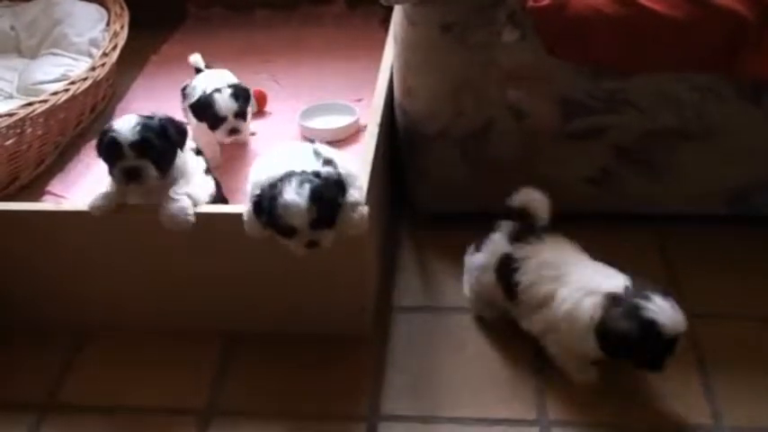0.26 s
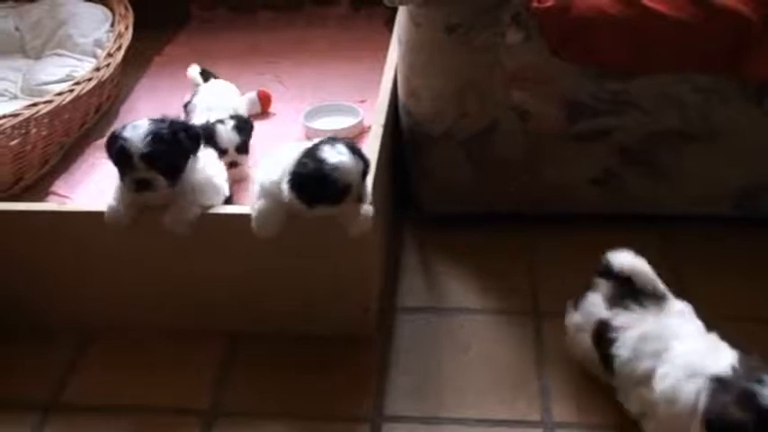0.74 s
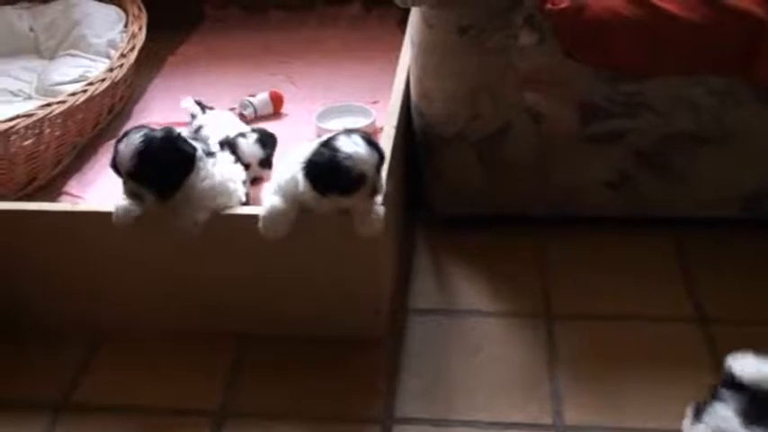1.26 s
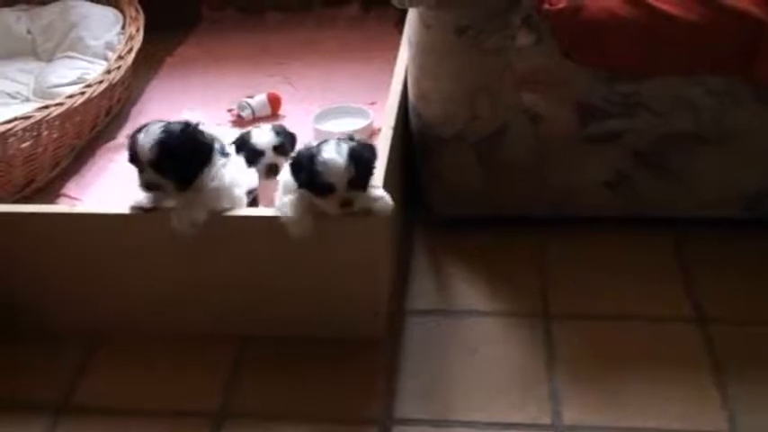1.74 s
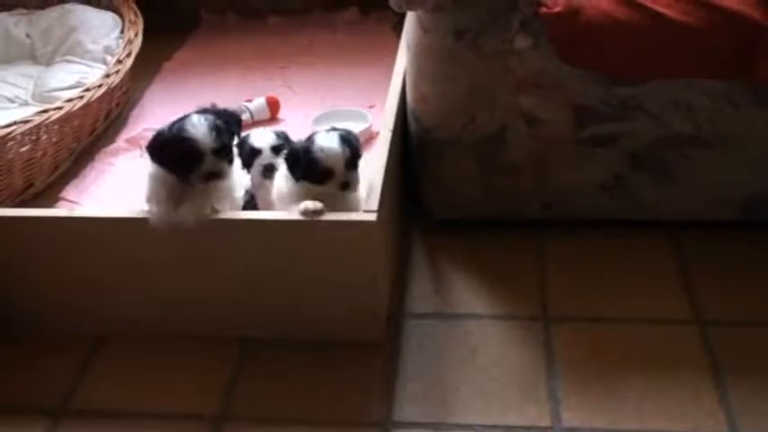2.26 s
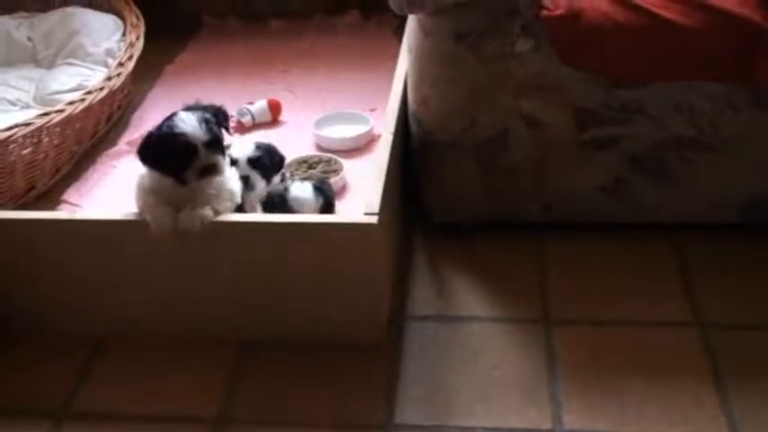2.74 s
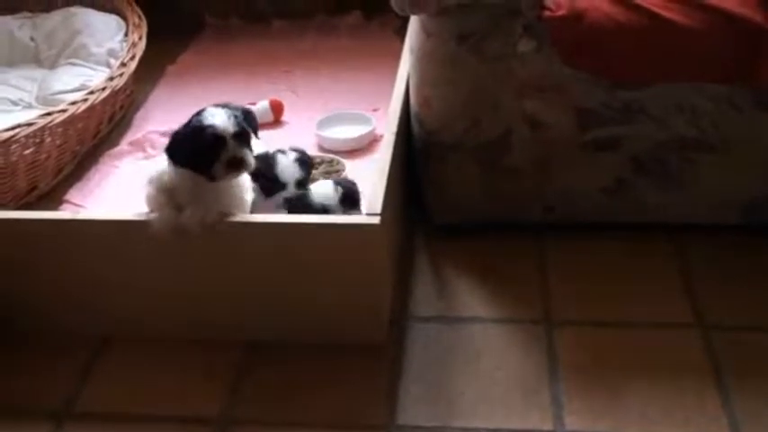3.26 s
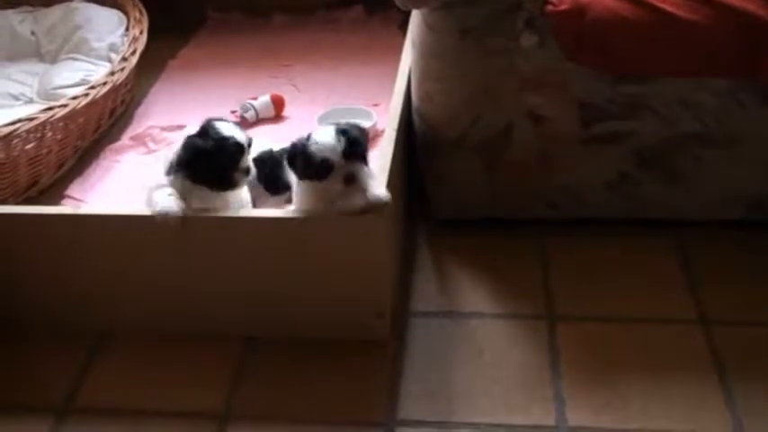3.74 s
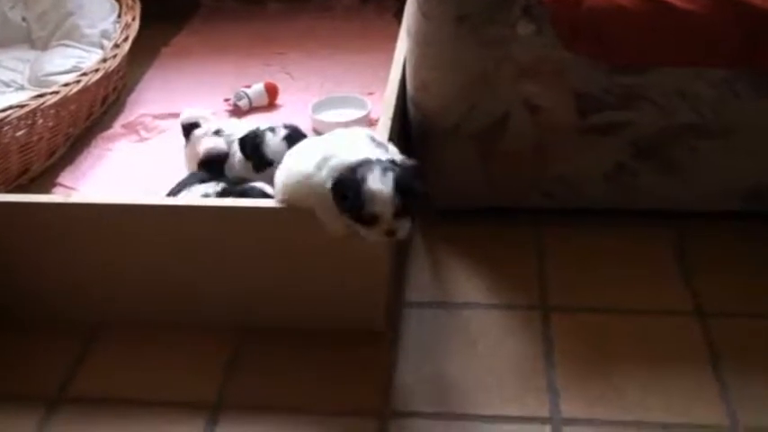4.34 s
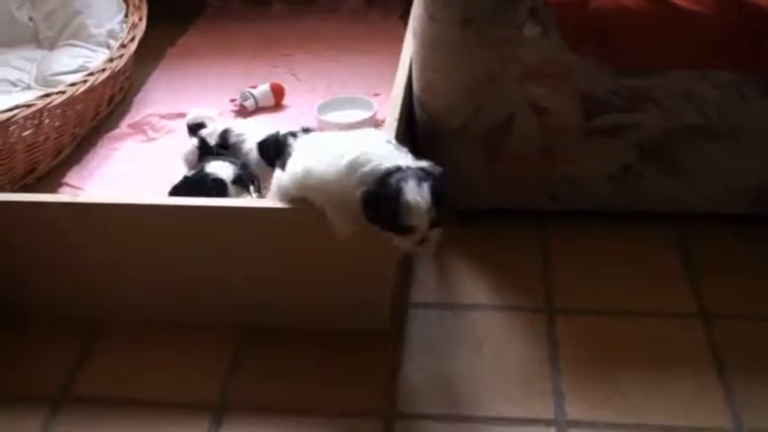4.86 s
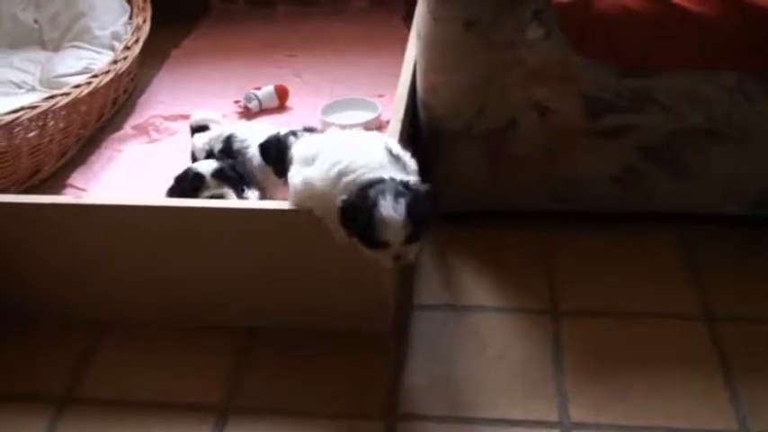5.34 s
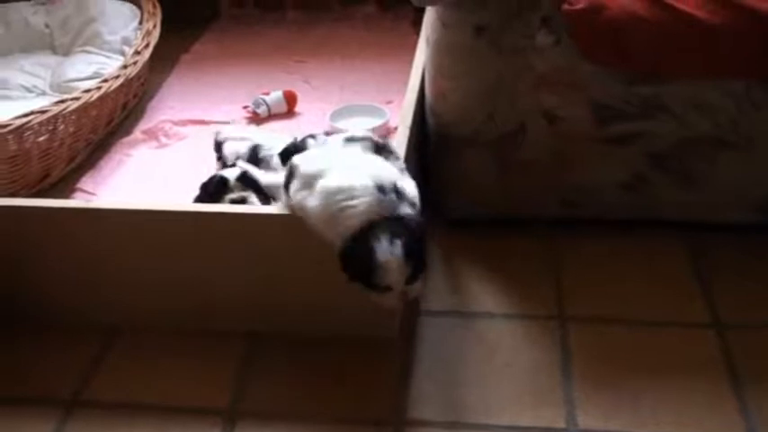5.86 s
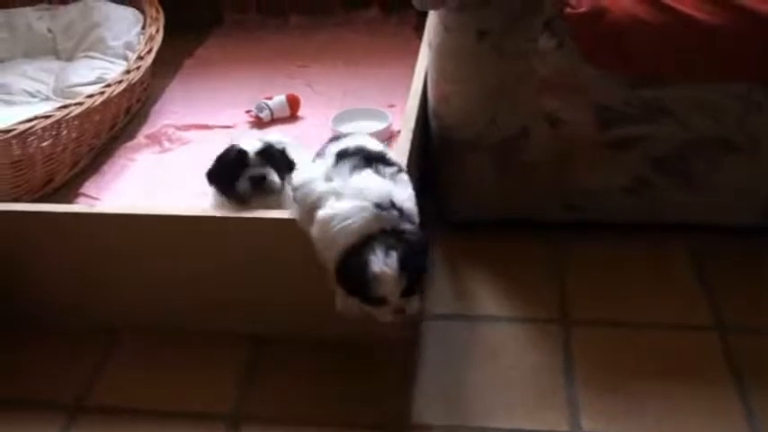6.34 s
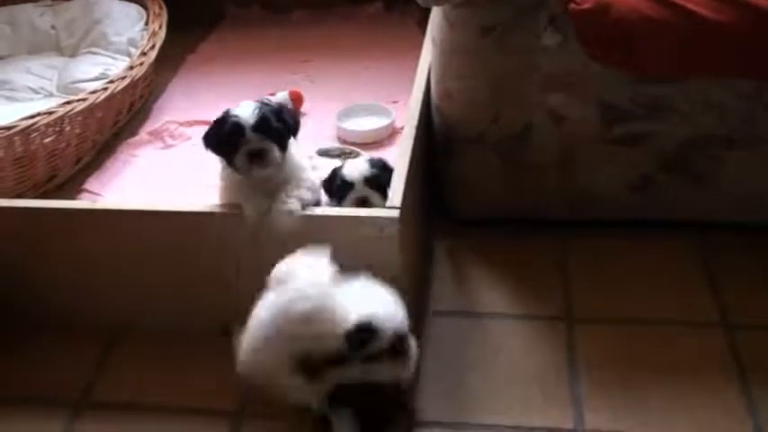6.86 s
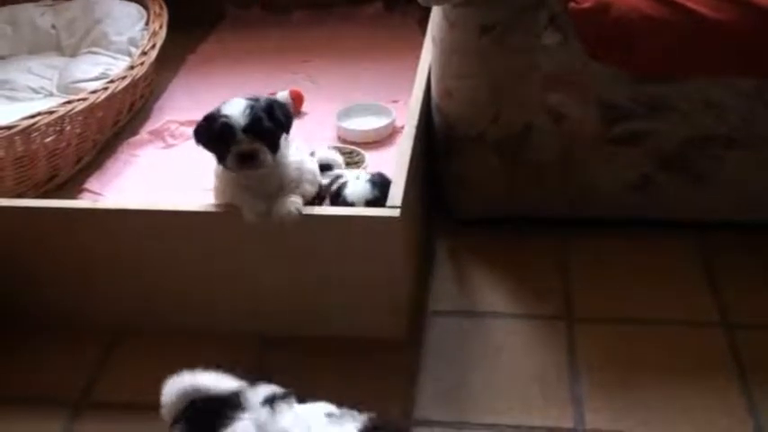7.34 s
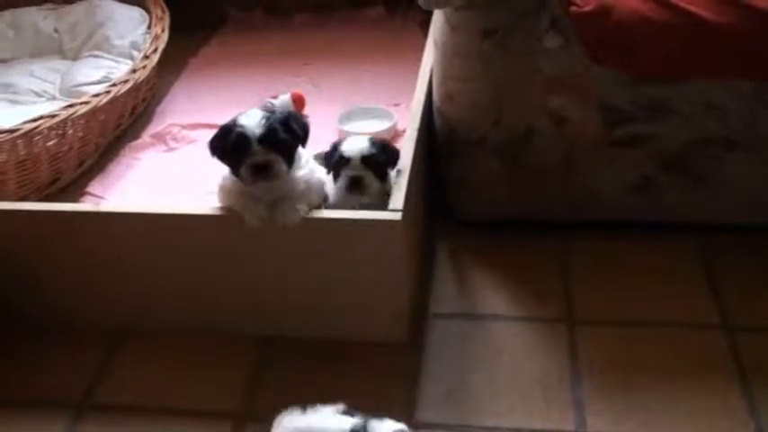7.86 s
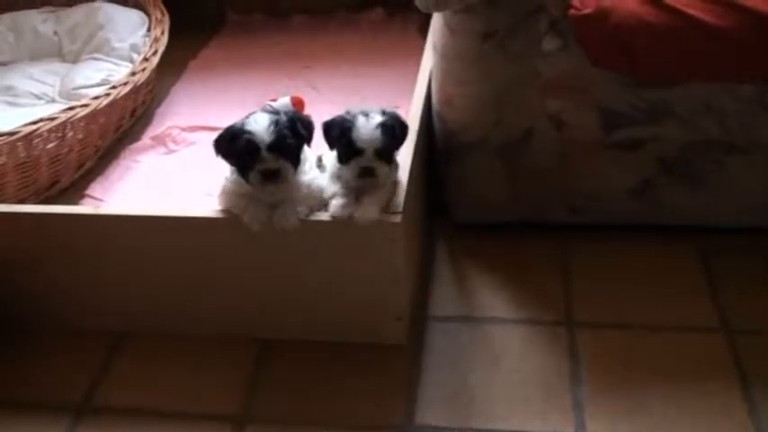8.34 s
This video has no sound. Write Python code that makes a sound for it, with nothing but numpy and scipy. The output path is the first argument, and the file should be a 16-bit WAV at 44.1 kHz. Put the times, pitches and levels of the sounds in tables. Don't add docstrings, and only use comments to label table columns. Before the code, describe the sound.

Several young puppies in a wooden pen indoors. Short yips and bedding rustle come first, then wavering, sinking whines with hoarse rasps between them. A nose blasts air like a sneeze, more whines rise, and two loud shrill squeals ring from further back. A puppy drops over the wall with a heavy hollow thud and claw clicks, then little but faint rustles. Small camera, sounds leaning right, soft room hiss.

```python
import sys
import numpy as np
from scipy import signal
from scipy.fft import rfft, irfft
from scipy.io import wavfile
from scipy.ndimage import uniform_filter1d

SR = 44100
rng = np.random.default_rng(int(sys.argv[2]) if len(sys.argv) > 2 else 0)


def to_wav(s):
    ch = np.atleast_2d(s).T
    pcm = np.round(np.clip(ch, -1, 1) * 32767)
    wavfile.write(sys.argv[1], SR, pcm.astype(np.int16))


def nominal_scale(level):
    x = np.asarray(level, float) / 20
    return 10 ** x


N = 379260


def evened(x):
    return x / np.sqrt(np.mean(x ** 2) + 1e-20)


def read(points, hz):
    f, value = np.transpose(points)
    return np.interp(np.log(hz + 1), np.log(f + 1), value)


def add(mix, s, sound):
    part = mix[max(round(s * SR), 0):][:len(sound)]
    part += sound[:len(part)]


def colour(x, points):
    gain = nominal_scale(read(points, np.fft.rfftfreq(x.shape[-1], 1 / SR)))
    return irfft(rfft(x) * gain, x.shape[-1])


def resonate(x, hz, width):
    turn = np.exp(2j * np.pi * hz * np.arange(len(x)) / SR)
    r = np.exp(-np.pi * width / SR)
    return 2 * (turn * signal.lfilter([(1 - r) ** 2], [1, -2 * r, r * r], x / turn)).real


def wander(count, smooth):
    noise = uniform_filter1d(rng.standard_normal(count), int(smooth))
    return evened(uniform_filter1d(noise, int(smooth)))


def air():
    # f/Hz, density/(dB per Hz)
    tone_spectrum = [(15, -53), (25, -47), (87, -9.5), (144, -3.5), (217, 1.5), (392, -2), (673, -1.5),
                     (1290, -3), (1510, -5), (8280, -19.5), (13500, -25), (15800, -29.5)]
    # f/Hz, likeness/1
    coherence = [(60, 0.25), (240, 0.25), (950, 0.43), (3770, 0.1), (15000, 0.061)]
    # t/s, level/dB
    rumble_level = [
        (0.0, -49.5),
        (4.36, -63.5),
        (8.6, -65),
    ]
    hz = np.fft.rfftfreq(N, 1 / SR)
    a, b, c = rfft(rng.standard_normal((3, N)))
    same = np.clip(read(coherence, hz), 0, 1)
    pair = np.array([a, same * a + np.sqrt(1 - same ** 2) * b]) * nominal_scale(read(tone_spectrum, hz))
    tone = nominal_scale(-51.5 - 0.1 + np.array([[-1.6], [1.6]])) * evened(irfft(pair, N))
    s, db = np.transpose(rumble_level)
    rumble_band = [(20, -7.0), (60, -7.5), (95, -4), (160, -23), (300, -80.0)]  # f/Hz, level/dB
    low = evened(irfft(c * nominal_scale(read(rumble_band, hz)), N))
    return tone + nominal_scale(np.interp(np.arange(N) / SR, s, db) + np.array([[-13], [1.5]])) * low


def rustle():
    # t of the peak/s, level/dB, fade/(dB per s)
    movements = [(.15, -52, 54), (.406, -54, 219), (.594, -58, 48), (1.2, -68, 1), (2.31, -58, 150),
                 (2.5, -68, 150), (2.86, -50.5, 217), (3.278, -59.5, 93), (4.73, -70.5, 86),
                 (5.066, -52.5, 200), (5.26, -65.5, 78), (5.9, -57.5, 95), (6.902, -52.5, 111),
                 (7.08, -55, 159), (7.426, -59, 104), (7.584, -51.5, 208), (8.4, -56, 220),
                 (4.24, -46.5, 62)]
    # f/Hz, density/(dB per Hz)
    cloth = [(880, -58), (1500, 8.5), (1970, 5.5), (2350, 5), (2640, -3), (7020, 1), (15500, -11)]
    t, level = np.arange(N) / SR, np.zeros(N)
    for s, db, fade_db in movements:
        slope_db = np.where(t < s, 257, fade_db)
        level += nominal_scale(db - slope_db * abs(t - s))
    grain = nominal_scale(2.4 * wander(N, smooth=66)) * rng.standard_normal((2, N))
    crossed = grain + 0.3 * grain[::-1]
    return nominal_scale(1.0) * uniform_filter1d(level, size=3000) * evened(colour(crossed, cloth))


def room(x, gap, scale):
    # f/Hz, t60/s
    decay_time = [(200, 0.38), (1000, 0.33), (3000, 0.44), (8000, 0.3), (15000, 0.3)]
    taps = np.zeros((2, SR))
    slots = np.arange(int(gap * SR), SR - 20, 20)
    at = slots + rng.integers(0, 20, (2, len(slots)))
    np.put_along_axis(taps, at, rng.choice([-1., 1.], at.shape), 1)
    taps[0] = 0.3 * taps[1] + 1.56 * taps[0]
    hz, t, z = signal.stft(taps, SR, nperseg=256)
    decay = nominal_scale(-60 * t / (scale * read(decay_time, hz)[:, None]))
    tail = signal.istft(z * decay, SR, nperseg=256)[1]
    tail = tail / np.linalg.norm(tail, axis=1)[:, None]
    return signal.fftconvolve(x[None], tail, axes=1)[:, :N]


def squeal(rows):
    overtones_db = [-4.5, -19.5, -40, -42, -33.5]
    # f/Hz, level/dB
    breath_spectrum = [(1300, -31), (1800, -5), (3200, 0), (3700, -9), (4400, -14.5), (6200, -6.5),
                       (7100, -13.5), (9000, -15), (15500, -56)]
    s, *columns = np.transpose(rows)
    t = np.arange(s[0], s[-1], 1 / SR)
    hz, db = (np.interp(t, s, c) for c in columns)
    unsteady = np.clip((-13 - db) / 520, .008, .07)
    phase = 2 * np.pi * np.cumsum(hz * (1 + unsteady * wander(len(t), smooth=60))) / SR
    tone = 0
    for k, d in enumerate(overtones_db, 1):
        tone = tone + nominal_scale(d + 3.53 * wander(len(t), smooth=130 / k)) * np.sin(k * phase)
    breath = nominal_scale(-16) * evened(colour(rng.standard_normal(len(t)), breath_spectrum))
    return s[0], nominal_scale(db) * (tone + breath) * signal.windows.tukey(len(t), .15)


def squeak(s, length, first_hz, last_hz, db):
    middle_hz = (first_hz + last_hz) / 2
    return [(s, first_hz, db), (s + length / 2, middle_hz, db), (s + length, last_hz, db - 17)]


def distant_puppies():
    # t/s, f/Hz, level/dB
    squeals = [
        [(3.89, 1850, -27.5), (3.96, 2104, -29), (3.99, 2900, -25), (4.08, 2300, -34.5), (4.12, 2890, -24.5),
         (4.15, 3062, -24.5), (4.2, 2950, -60)],
        [(6.15, 1552, -35.5), (6.18, 1955, -24), (6.22, 2250, -23), (6.25, 3000, -16), (6.28, 3230, -17),
         (6.33, 3306, -17), (6.39, 3210, -30.5)],
        [(6.37, 1700, -30), (6.44, 2062, -26), (6.51, 3085, -22), (6.56, 2650, -29), (6.6, 3177, -22.5),
         (6.64, 3318, -23), (6.7, 3350, -43), (6.85, 3350, -75.5)],
    ]
    # t/s, length/s, first f/Hz, last f/Hz, level/dB
    squeaks = [(0, 0.086, 2955, 2490, -41.5), (0.225, 0.07, 2600, 2547, -36), (0.633, .1, 3650, 3520, -48),
               (1.093, 0.065, 2600, 3150, -44.5), (1.18, 0.098, 2363, 2875, -45.5),
               (2.292, .16, 2702, 3000, -49.5), (3.929, .3, 1940, 2348, -34),
               (3.785, 0.088, 2800, 3287, -34), (5.254, 0.093, 2537, 3124, -43),
               (5.37, 0.051, 2440, 2430, -52), (8.508, 0.066, 1900, 2420, -48.5),
               (8.51, .06, 1462, 1600, -52)]
    # f/Hz, level/dB
    far_throat = [(3500, 0.5), (3750, -7), (4200, -1.5), (4700, 1.5), (6750, -1.5), (7100, -14), (7700, -7),
                  (8600, -2)]
    far = np.zeros(N)
    for rows in squeals + [squeak(*row) for row in squeaks]:
        add(far, *squeal(rows))
    return colour(far, far_throat)


def step(s, thud_db, knock_db, tick_db):
    # f/Hz, level/dB
    thud_spectrum = [(40, -44), (90, 2), (145, -3), (220, -3.5), (350, -12.5), (700, -59)]
    # f/Hz, width/Hz, level/dB
    knock_modes = [(461, 175, 1), (650, 48, 0), (1030, 370, -4), (1410, 320, -12.5), (1830, 1200, -19)]
    # f/Hz, width/Hz, level/dB
    tick_modes = [(1540, 1200, 5), (2650, 670, 8), (3820, 1040, 3), (5830, 2300, -2.5), (7340, 4700, -14.5),
                  (10600, 2000, -19)]

    def struck(x, modes):
        return evened(sum(nominal_scale(d) * evened(resonate(x, f, w)) for f, w, d in modes))

    t = np.arange(8192) / SR
    low, mid, high = rng.standard_normal((3, len(t)))
    boom = evened(colour(low, thud_spectrum))
    boom += 0.67 * np.sin(2 * np.pi * 150 * t) + 0.28 * np.sin(2 * np.pi * 205 * t)
    knock, tick = struck(mid, knock_modes), struck(high, tick_modes)
    out = boom * (1 - np.exp(-t / 0.0049)) * nominal_scale(thud_db - 1.5 - 60 * t / 0.12)
    out += knock * (1 - np.exp(-t / 0.0013)) * nominal_scale(knock_db + 6 - 60 * t / 0.044)
    out += tick * (1 - np.exp(-t / 0.0018)) * nominal_scale(tick_db + 7.5 - 60 * t / 0.026)
    return s, out


def paws(near):
    # t/s, thud level/dB, knock level/dB, tick level/dB
    contacts = [(0.164, -39, -43, -35), (1.74, -40, -39.5, -42.5), (1.95, -37, -35, -57),
                (.73, -67, -70, -48), (1.8, -45, -65, -70), (4.382, -47, -67, -56), (6.582, -52, -68, -70),
                (5.058, -56.5, -41, -42.5), (5.135, -74, -48, -40), (2.431, -64, -55, -37),
                (5.545, -74, -46.5, -47.5), (5.946, -65, -52, -38), (6.805, -32, -28.5, -60),
                (6.821, -30.5, -32, -61), (6.898, -54, -37, -26.5), (6.91, -24, -23.5, -48),
                (7.04, -44, -67, -63), (7.062, -47, -46, -49), (7.117, -64, -38.5, -66),
                (7.158, -42, -66, -49.5), (7.755, -68, -73, -60), (7.999, -68.5, -77.5, -61.5)]
    for row in contacts:
        add(near, *step(*row))


def sneeze():
    # f/Hz, width/Hz, level/dB
    nostril = [(3000, 680, 2), (5160, 1560, 6.5), (6200, 1470, 5.5), (7600, 3400, -1.5), (11300, 9300, -30)]
    intake_s, intake_end_s, blast_s, end_s = 4.249, 4.31, 4.372, 4.535
    t = np.arange(intake_s, end_s, 1 / SR)
    intake = nominal_scale(-42.5) * np.clip(np.minimum(intake_end_s - t, t - intake_s) / 0.016, 0, 1)
    blast = np.clip((t - blast_s) / 0.03, 0, 1) * nominal_scale(-29 - 95 * (t - blast_s))
    jet = rng.standard_normal(len(t)) * nominal_scale(2.5 * wander(len(t), smooth=100))
    nose = evened(sum(nominal_scale(d) * evened(resonate(jet, f, w)) for f, w, d in nostril))
    return intake_s, (intake + blast) * nose


def rasp(s, length, hz, db, rough, mouth):
    # f/Hz, width/Hz, level/dB
    throat_modes = [(339, 81, 0), (950, 396, 11), (1916, 220, 0.5), (2600, 860, -2.5)]
    u = np.linspace(0, 1, int(length * SR))
    arch = .78 + .25 * np.sin(np.pi * u ** .8)
    jitter = 1 + .25 * rough * wander(len(u), smooth=60)
    turns = np.cumsum(hz * arch * jitter) / SR
    folds = sum(np.cos(2 * np.pi * k * turns) for k in range(1, 12))
    puffs = np.exp(-(turns % 1) / .4) * rng.standard_normal(len(u))
    drive = (1 - rough) * evened(folds) + rough * evened(puffs)
    throat = sum(nominal_scale(d) * resonate(drive, f * mouth, w) for f, w, d in throat_modes)
    return s, nominal_scale(db) * evened(throat) * signal.windows.tukey(len(u), .5)


def yip(s, length, first_hz, last_hz, db):
    u = np.linspace(0, 1, 9)
    ends_db = np.where(u < .5, -0.5, 1) * (2 * u - 1) ** 2
    climb = np.minimum(u / .85, 1) ** 1.1
    return np.transpose([s + u * length, first_hz + (last_hz - first_hz) * climb, db + ends_db])


def whine(rows, mouth_db):
    # f/Hz, level/dB
    lower_colour = [(800, -4), (1000, 1.5), (1200, -4.5), (1400, 0), (1800, -12.5), (2100, -3.5),
                    (2450, -4), (3000, -12.5)]
    # f/Hz, level/dB
    upper_colour = [(1410, 3), (2400, 9.5), (3330, 0.5), (3800, -9), (4310, -10), (5490, -12), (5980, -19),
                    (7560, -4), (9780, -27), (11900, -13.5), (15500, -26.5)]
    # f/Hz, level/dB
    nasal = [(3000, 7), (3900, -4.5), (5600, -9), (6600, 3), (8500, 6), (11000, -8)]
    s, *columns = np.transpose(rows)
    t = np.arange(s[0], s[-1], 1 / SR)
    hz, db = (np.interp(t, s, c) for c in columns)
    echo_null_db = -10 * np.exp(-((hz - 936) / 5.8) ** 2)
    first_db = db + read(lower_colour, hz) + echo_null_db
    second_db = db + read(lower_colour, 2 * hz) + 0.13 * mouth_db
    upper_db = db - 10 + mouth_db + 0.25 * (db + 28.5)

    hz = uniform_filter1d(hz, 350) * (1 + 0.011 * wander(len(t), smooth=250))
    phase = 2 * np.pi * np.cumsum(hz) / SR
    glide = abs(np.gradient(np.log(uniform_filter1d(hz, 800))))
    strain = np.minimum(glide * SR / 20, .4)
    low = nominal_scale(first_db) * np.sin(phase) + nominal_scale(second_db) * np.sin(2 * phase)
    low *= 1 + strain * wander(len(t), smooth=113)
    upper_db = upper_db - 10.5 * strain

    upper = []
    for k in range(3, 19):
        gain_db = read(upper_colour, k * hz) + (s[0] > 4.3) * read(nasal, k * hz)
        upper.append(nominal_scale(gain_db) * (k * hz < SR / 2.6))
    stack = 0
    for k, a in enumerate(upper, 3):
        patchy = nominal_scale(4.5 * wander(len(t), smooth=790))
        stack = stack + a * patchy * np.sin(k * phase + k * k)
    stack = stack / np.linalg.norm(upper, axis=0)
    breath = evened(colour(rng.standard_normal(len(t)), upper_colour)) * (1 + np.sin(phase))
    voice = np.sqrt(2) * (low + nominal_scale(upper_db) * stack) + nominal_scale(upper_db - 17) * breath
    return s[0], voice * signal.windows.tukey(len(t), 560 / len(t))


def near_puppies(near):
    # t/s, f/Hz, effort level/dB
    early_whines = [
        [(1.5, 1220, -46), (1.55, 1352, -41.5), (1.6, 1215, -36.5), (1.66, 1330, -37), (1.712, 1241, -35.5),
         (1.739, 1234, -37.5)],
        [(1.86, 936, -42), (1.892, 874, -35.5), (1.936, 1108, -44.5), (1.97, 1060, -32.5), (2.028, 1422, -35),
         (2.054, 1240, -33), (2.117, 1181, -30), (2.2, 1031, -28.5), (2.299, 964.6, -30)],
        [(2.535, 975, -42), (2.557, 915.5, -31.5), (2.645, 936, -31), (2.683, 946, -29.5), (2.717, 936, -29.5),
         (2.741, 927.6, -29), (2.794, 896, -27), (2.884, 844.5, -37)],
        [(3.072, 934, -52), (3.088, 914, -35.5), (3.118, 1213, -34.5), (3.15, 1229, -34.5), (3.172, 1005, -33),
         (3.228, 888, -30), (3.305, 864.4, -33.5), (3.329, 798, -32)],
    ]
    # t/s, f/Hz, effort level/dB
    late_whines = [
        [(3.537, 1016, -38.5), (3.557, 1060, -33.5), (3.577, 1238, -32), (3.647, 1052, -30.5),
         (3.691, 1030, -32.5), (3.778, 981, -38.5)],
        [(3.982, 980, -34.5), (4.004, 1027, -31.5), (4.035, 1284, -36.5), (4.058, 1224, -37),
         (4.094, 1079, -29), (4.15, 1182, -28), (4.19, 1300, -32.5), (4.22, 1255, -34)],
        [(4.636, 1016, -30), (4.655, 1055, -30.5), (4.69, 1292, -32.5), (4.736, 1356, -29)],
        [(5.942, 1278, -38.5), (5.978, 1277, -31), (6.012, 1464, -34), (6.03, 1540, -39)],
        [(5.132, 1258, -35), (5.146, 1362, -41), (5.218, 1394, -35), (5.246, 1293, -37.5), (5.264, 1435, -38.5)],
    ]
    mouths_db = [-2, -3.5, -3.5, -4, 2, -1, -5.5, -7, 1]
    # t/s, length/s, first f/Hz, last f/Hz, effort level/dB
    yips = [
        (.092, 0.037, 950, 1276, -36),
        (.298, .066, 900, 1302, -32),
        (0.566, 0.059, 873, 1305, -38.5),
        (0.834, 0.022, 1002, 963, -44.5),
        (2.495, 0.048, 1008, 1327, -43.5),
        (4.434, 0.036, 1232, 1380, -38.5),
        (5.631, 0.095, 1149, 1515, -41),
    ]
    # t/s, length/s, pulse f/Hz, level/dB, roughness/1
    rasps = [(.84, 0.027, 889, -43.5, 0.95), (1.072, 0.048, 1058, -38.5, 0.47),
             (1.499, 0.04, 909, -47, 1.07), (2.284, .034, 928, -37, 0.33), (2.531, 0.033, 830, -37, 0.47),
             (2.829, 0.071, 400.7, -33, 0.7), (3.222, .11, 429.3, -36, 0.5),
             (5.372, 0.14, 338.4, -42.5, 0.52), (7.548, 0.051, 298, -55.5, .53),
             (5.978, 0.037, 388, -44.5, 0.08), (0.279, 0.033, 851, -45, .7), (3.763, .03, 970, -48, 0.8)]
    # t/s, length/s, pulse f/Hz, level/dB, roughness/1
    grunts = [
        (0.603, 0.039, 316, -52, 0.17),
        (2.384, 0.089, 554, -51.5, 0.35),
        (4.801, 0.087, 348.4, -51.5, 0.34),
        (5.051, 0.04, 291, -48, 0.4),
    ]
    for rows, mouth_db in zip(early_whines + late_whines, mouths_db):
        add(near, *whine(rows, mouth_db))
    for row in yips:
        add(near, *whine(yip(*row), -2))
    for row in rasps:
        add(near, *rasp(*row, 0.98))
    for row in grunts:
        add(near, *rasp(*row, 0.00127 * row[2]))


def scene():
    # f/Hz, level/dB
    side_lean = [(60, -12), (180, -13), (550, -5), (1650, -6.5), (4970, -8), (15000, -8)]
    near = np.zeros(N)
    near_puppies(near)
    paws(near)
    add(near, *sneeze())
    far = distant_puppies()
    sound = nominal_scale(-2.0) * near + nominal_scale(-4.0) * room(near, .002, 0.86)
    sound = sound + nominal_scale(-4.5) * far + room(far, .002, 1.1) + rustle()
    lean = read(side_lean, np.fft.rfftfreq(N, 1 / SR)) / 2
    return irfft(rfft(sound) * nominal_scale(np.array([lean, -lean]) + 4.5), N) + air()


def top_cut(x):
    return signal.sosfilt(signal.butter(12, 15970, fs=SR, output="sos"), x)


def record(dry):
    # f/Hz, margin/dB
    masking_margin = [(1300, 47), (4500, 42), (7500, 46), (10000, 41), (12000, 52), (14500, 47),
                      (15800, 40)]
    hz, _, z = signal.stft(dry, SR, nperseg=1024, noverlap=768)
    power = uniform_filter1d((abs(z) ** 2).mean(0), size=5, axis=1)
    band_db = 10 * np.log10(power[:512].reshape(64, 8, -1).sum(1) + 1e-14)
    chance = uniform_filter1d(rng.standard_normal(band_db.shape), size=6, axis=1) * np.sqrt(6)
    margin_db = read(masking_margin, hz[4:512:8])[:, None] + 2.5 * chance
    keep = band_db > 10 * np.log10(power.sum(0) + 1e-14) - margin_db
    keep = np.vstack([np.repeat(keep, 8, axis=0), keep[-1:]])
    keep = keep | (hz[:, None] < 1300)
    mix = signal.istft(z * keep, SR, nperseg=1024, noverlap=768)[1][:, :N]
    return top_cut(mix)


dry = scene()
out = record(dry)
to_wav(out)
```